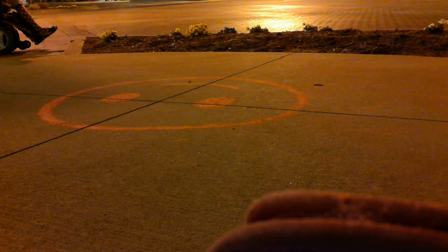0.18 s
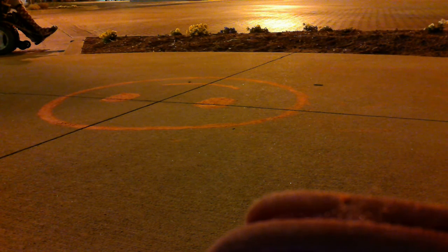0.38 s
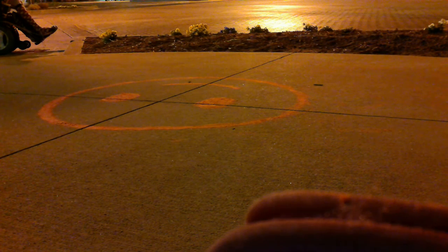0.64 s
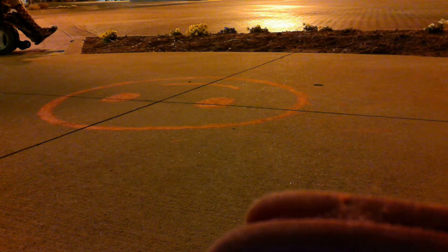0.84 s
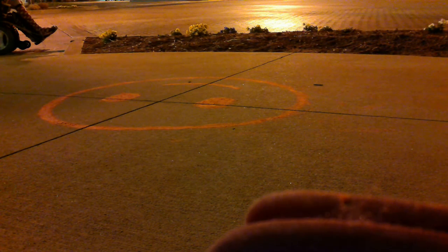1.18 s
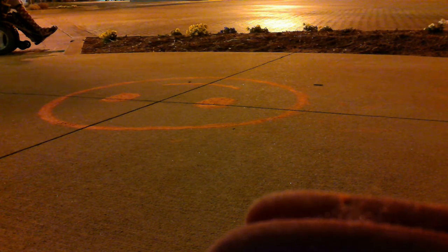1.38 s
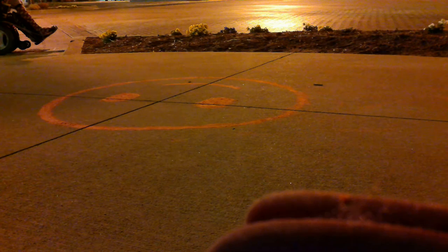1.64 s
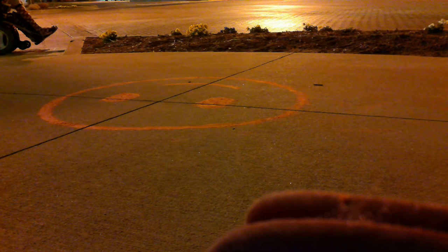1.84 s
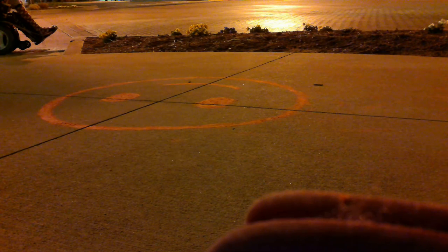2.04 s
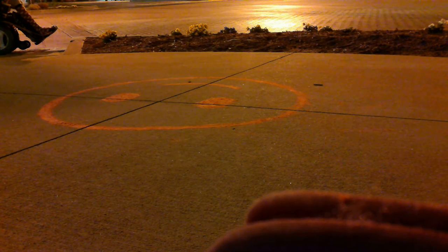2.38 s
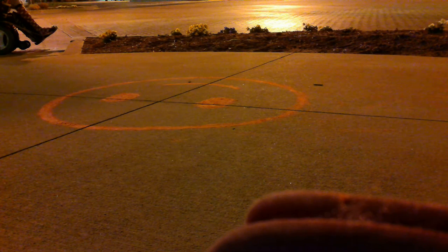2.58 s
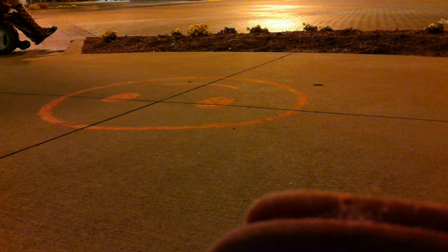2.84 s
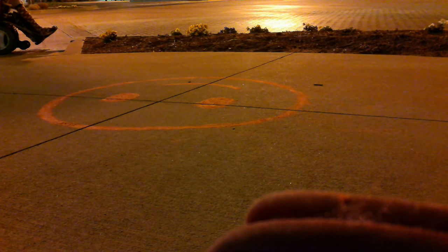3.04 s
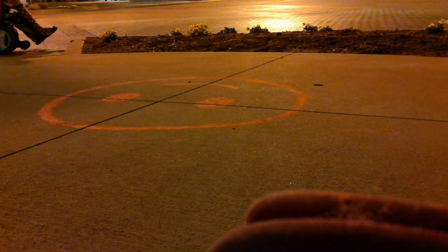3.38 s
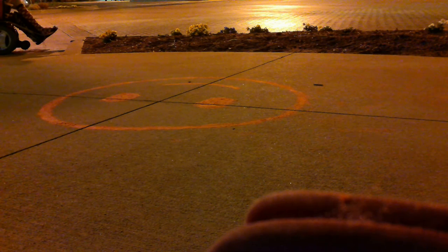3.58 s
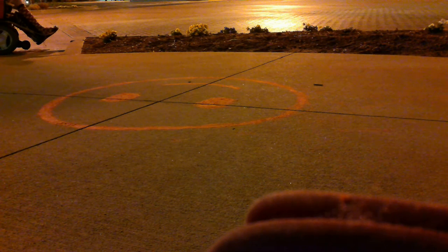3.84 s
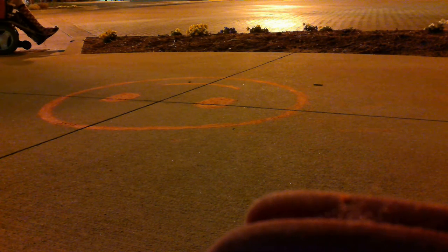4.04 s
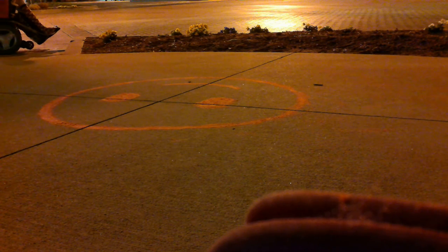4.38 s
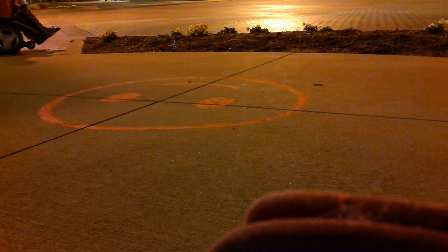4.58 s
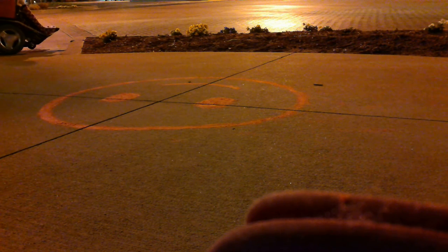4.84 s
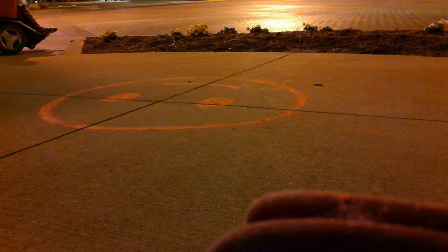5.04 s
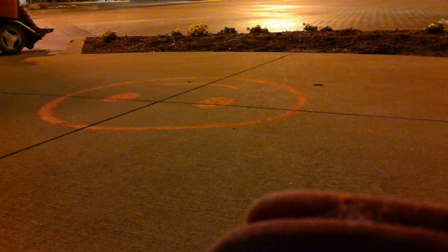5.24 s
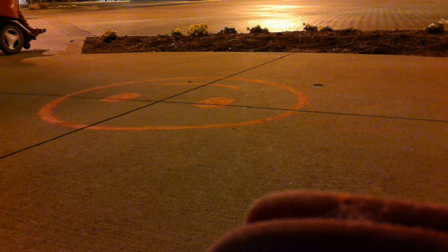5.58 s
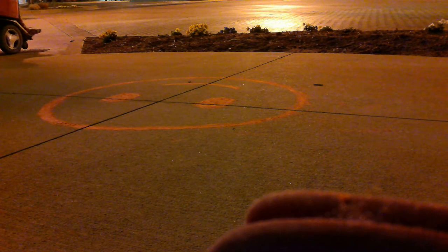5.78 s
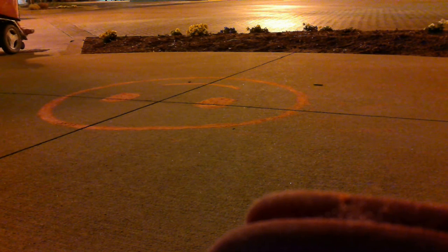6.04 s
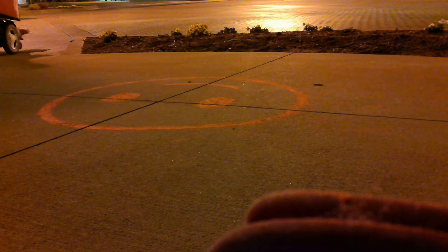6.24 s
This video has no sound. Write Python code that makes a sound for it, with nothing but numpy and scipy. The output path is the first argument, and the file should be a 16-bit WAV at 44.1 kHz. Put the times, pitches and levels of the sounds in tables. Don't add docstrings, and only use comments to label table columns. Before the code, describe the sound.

Open paved area, quiet town rumble below and a thin, constant high hiss. At 0 s a deep pulsing motor hum, roughly 57 pulses a second, sounds under a soft far tyre rush that fades over the first second or so. By 0.7 s the hum has thinned and slowed; from 1.3 s it builds as the vehicle creeps nearer, rising slightly around 2 s. At 1.93 s a stone snaps sharply, with a brief panel ring and small rattles. From 2.5 to 4.2 s the drone lopes unevenly and close, with faint metallic ticks and sandy flecks. Fine grit crackles at 4.3-4.5 s. The pitch sags to a heavy throb near 4.8-5.1 s, then climbs strongly to about 6 s, with near wheel rush, singing panels and a dull pebble tick at 5.73 s. It eases slightly, still humming, at 6.4 s. Treble drifts from left to right.

```python
import sys
import numpy as np
from scipy import signal
from scipy.fft import rfft, irfft
from scipy.io import wavfile
from scipy.ndimage import uniform_filter1d

SR = 44100
rng = np.random.default_rng(int(sys.argv[2]) if len(sys.argv) > 2 else 0)


def gain_from_db(level_db):
    decades = np.asarray(level_db, float) / 20
    return 10 ** decades


def master_out(mix):
    frames = np.transpose(np.atleast_2d(mix))
    ceiling = np.clip(frames, -1, 1)
    pcm = np.round(ceiling * 32767).astype(np.int16)
    wavfile.write(sys.argv[1], SR, pcm)


N = 283122
TIME = np.arange(N) / SR
FREQ = np.maximum(np.arange(N // 2 + 1) * SR / N, 1)

# time in seconds, pulse rate in Hz.
PULSE_RATE = [(0.0, 57.22), (0.4, 53.33), (0.8, 50.3), (1.4, 48.8), (1.6, 49.68), (1.9, 53.35),
              (2.2, 54.37), (2.4, 52.77), (2.6, 50.35), (3.0, 49.09), (3.6, 50.17), (4.2, 46.12),
              (4.8, 37.11), (5.1, 37.2), (5.4, 44.66), (5.8, 58.46), (6.0, 61.4), (6.42, 56.39)]
# time in seconds, distance in metres.
DISTANCE_M = [
    (0.0, 7.8),
    (0.7, 7.5),
    (1.7, 3.34),
    (2.0, 3.12),
    (3.4, 2.43),
    (4.4, 2.64),
    (5.0, 3.4),
    (5.5, 2),
    (5.75, 1.3),
    (6.42, 1.8),
]


def curve(table):
    seconds, *columns = np.transpose(table)
    return [np.interp(TIME, seconds, column) for column in columns]


def over_hz(table):
    hz, value = np.array(table).T
    return np.interp(np.log(FREQ), np.log(hz), value)


def unit(x):
    return x / np.sqrt(np.mean(x ** 2))


def walk(rate, size=N):
    hold = int(SR / rate)
    steps = np.repeat(rng.standard_normal(size // hold + 1), hold)
    return 1.71 * uniform_filter1d(uniform_filter1d(steps, hold), hold)[:size]


def ring(x, hz, width):
    b, a = signal.iirpeak(min(hz, 0.45 * SR), hz / width, SR)
    return signal.lfilter(b, a, x)


def pipe(x, modes):
    out = 0
    for k, (hz, width, db) in enumerate(modes):
        wide = 1.43 * width
        out = out + (-1) ** k * gain_from_db(db) * ring(ring(x, hz, wide), hz, wide)
    return unit(out)


def airy(spectrum, swell_db, flicker_db):
    lowest_hz, highest_hz = spectrum[0][0], spectrum[-1][0]
    noise = rfft(rng.standard_normal((2, N))) * gain_from_db(over_hz(spectrum))
    noise[:, (FREQ < lowest_hz) | (FREQ > highest_hz)] = 0
    swell = swell_db * walk(1.55)
    first, last = np.log2([lowest_hz, highest_hz]).astype(int)
    out = 0
    for octave in range(first, last + 2):
        part = np.cos(np.pi / 2 * np.clip(np.log2(FREQ) - octave, -1, 1)) ** 2
        out = out + gain_from_db(swell + flicker_db * walk(14)) * irfft(noise * part, N)
    return unit(out)


def echoed(x, lag_s):
    return np.array([x, np.pad(x, (int(lag_s * SR), 0))[:N]])


def town():
    # frequency in Hz, level in dB.
    rumble = [(15, -4), (28, -19), (45, -12.5), (80, -10), (140, -15), (300, -25.5)]
    return gain_from_db(-34.5) * airy(rumble, swell_db=2.4, flicker_db=-2.0)


def recorder_hiss():
    # frequency in Hz, level in dB.
    hiss_colour = [(4000, 2), (5500, 0), (7000, -9), (8600, -9.5), (9600, -4.5), (12000, -1), (13500, 1),
                   (15300, 2), (15780, -5)]
    hiss = gain_from_db(-60) * airy(hiss_colour, swell_db=0.2, flicker_db=0.5)
    return hiss + gain_from_db(-76) * np.sin(2 * np.pi * 14700 * TIME)


def tyres():
    # frequency in Hz, level in dB.
    road_colour = [(110, -8), (200, -11.5), (300, -17), (570, -21), (1000, -24), (1600, -32), (2500, -42),
                   (4500, -52.5)]
    recedes_s, rolls_from_s, rise_s = 0.62, 5.04, 0.61
    far = gain_from_db(-36.5) / np.hypot(1, TIME / recedes_s) ** 0.53
    near = gain_from_db(-41.5) * np.clip((TIME - rolls_from_s) / rise_s, 0, 1)
    road = airy(road_colour, swell_db=0.3, flicker_db=0.9)
    return far * road, near * road[:, ::-1]


def flecks():
    per_second, hz, width_hz = 41, 3820, 1100
    chance, size = rng.random(N), rng.exponential(size=N)
    hits = (chance < per_second / SR) * gain_from_db(-49 + 2.5 * np.minimum(size, 3))
    grains = uniform_filter1d(hits, size=260) * 260 * rng.standard_normal(N)
    return ring(ring(grains, hz, width_hz), hz, width_hz) / curve(DISTANCE_M)[0]


def grit():
    # start in seconds, peak in dB, ring in Hz, time to fall 60 dB in seconds, brightness in dB.
    snaps = [
        (1.9286, -15, 4800, 0.0067, -2),
        (1.929, -26, 1900, 0.018, -20),
        (1.93, -20, 5270, 0.013, 7),
        (1.936, -36, 5800, .014, -10),
        (1.9425, -38, 3500, .015, -14),
        (1.9625, -33, 1600, .03, -12),
        (1.9705, -47, 1700, 0.018, -14),
        (1.9775, -35, 6000, .02, -6),
        (1.9855, -40, 5600, .015, -10),
        (1.9944, -32, 6200, .016, -6),
    ]
    # start in seconds, peak in dB, ring in Hz.
    fine_grit = [(4.2914, -50, 10530), (4.316, -34, 12500), (4.3354, -40, 11000), (4.3375, -39, 11000),
                 (4.357, -42, 11000), (4.3735, -41, 11500), (4.388, -45, 11000), (4.418, -43, 11000),
                 (4.433, -45, 12000), (4.468, -45, 10600), (4.402, -37.5, 10000), (4.4503, -41, 9500),
                 (4.862, -41, 8200), (5.0824, -38.5, 7640), (5.2849, -42, 7337)]
    # frequency in Hz, level in dB, time to fall 60 dB in seconds.
    panel_modes = [(790, -5, .04), (1014, -9.5, 0.13), (1220, -8, 0.085), (1406, -5, 0.082),
                   (1620, -2, 0.05), (1860, -1.5, 0.07), (2230, -2, .025), (2640, -4, 0.039),
                   (3900, 8, 0.013), (4660, -5, .012), (5300, 7.5, 0.012), (5750, -7, .012),
                   (6200, 7, 0.018)]
    out, t = np.zeros(N + 4096), np.arange(4096) / SR
    fine_fall_s, fine_bright_db = 0.008, -3
    stones = list(snaps) + [(*row, fine_fall_s, fine_bright_db) for row in fine_grit]
    for s, peak_db, hz, t60, bright_db in stones:
        crack = rng.standard_normal(4096) * gain_from_db(-60 * t / max(t60, 0.002))
        width = hz * (1.3 if peak_db > -20 else 0.75)
        pitch = unit(ring(ring(crack, hz, width), hz, width))
        grain = pitch + gain_from_db(bright_db) * unit(ring(crack, 12000, 8000))
        out[int(s * SR):][:4096] += gain_from_db(peak_db) * grain / np.abs(grain).max()
    panel = sum(gain_from_db(db - 60 * t / t60) * np.sin(2 * np.pi * hz * t) for hz, db, t60 in panel_modes)
    panel = panel * np.minimum(t / 0.00057, 1)
    scatter = ring(ring(rng.standard_normal(4096), 6100, 2200), 6100, 2200)
    scatter = scatter * gain_from_db(-60 * t / 0.64) * (t < 0.072)
    out[int(snaps[0][0] * SR):][:4096] += gain_from_db(-30.0) * panel + gain_from_db(-39.5) * scatter
    return out[:N]


def pebble():
    # start in seconds, peak in dB.
    strikes = [
        (5.7325, -29),
    ]
    # frequency in Hz, level in dB, time to fall 60 dB in seconds.
    arch_modes = [(1920, -1, 0.024), (1600, -16, .012), (2350, -18, .012), (2840, 1, 0.019),
                  (3230, -3, .012), (3540, 0, 0.017), (4980, -4, .012), (7300, -6, .01), (9200, -8, .01),
                  (11000, -12, .01)]
    out, t = np.zeros(N), np.arange(2048) / SR
    arch = sum(gain_from_db(db - 60 * t / t60) * np.sin(2 * np.pi * hz * t) for hz, db, t60 in arch_modes)
    arch = arch * np.minimum(t / 0.00015, 1)
    for s, peak_db in strikes:
        out[int(s * SR):][:2048] += gain_from_db(peak_db) * arch / np.abs(arch).max()
    return out


def tappets():
    # start in seconds, peak in dB, ring in Hz.
    ticks = [(1.401, -51, 3150), (1.4065, -50, 4110), (1.455, -57, 4150), (1.665, -52, 2350),
             (1.692, -48, 2540), (1.77, -52, 3150), (1.954, -39.5, 2350), (1.9944, -44, 4100),
             (2.1821, -55, 3772), (2.3228, -60, 4448), (2.4151, -57, 3560), (2.484, -60, 3978),
             (2.6805, -50, 3752), (2.8082, -53, 4120), (2.9354, -56, 3440), (3.0063, -58, 3650),
             (3.118, -46, 4250), (3.1689, -48, 3840), (3.3305, -48, 4000), (3.3859, -55, 3414),
             (3.4418, -49, 4420), (3.4917, -51, 4390), (3.553, -57, 3780), (3.5969, -54, 4365),
             (3.6837, -62, 3678), (3.7586, -55, 3550), (3.8104, -52, 4220), (3.8713, -56, 3560),
             (3.9252, -50, 3624), (3.9686, -55, 3617), (4.0898, -49, 3530), (4.1447, -50, 4470),
             (4.2065, -57, 3636), (4.2679, -52, 4178), (4.3253, -49, 3820), (4.45, -53, 4438),
             (4.5099, -49, 4445), (4.6411, -57, 3730), (4.7129, -49, 3420), (4.7822, -47.5, 3600),
             (4.865, -49, 3936), (4.9339, -51, 3960), (5.0022, -54, 3530), (5.0816, -50, 3540),
             (5.1444, -59, 3620), (5.2138, -58, 3490), (5.2891, -52, 3550), (5.341, -48, 3510),
             (5.4173, -57, 3660), (5.4622, -52, 3560), (5.5171, -47, 3560), (5.6562, -51, 4028),
             (5.7325, -44, 3480), (5.8039, -52, 4464), (5.8573, -53, 3560), (5.8937, -50, 3560),
             (5.9446, -48, 3520), (6.0693, -49, 3571), (6.2933, -51, 3631), (6.3621, -49, 3809)]
    # frequency in Hz, level in dB.
    cover_modes = [(3620, -8), (3900, -23), (4180, -11), (4440, -4.5)]
    trim_db, rise_s, fall_s = -5.5, 0.0012, 0.047
    out, t = np.zeros(N + 2048), np.arange(2048) / SR
    shape = (1 - np.exp(-t / rise_s)) * gain_from_db(-60 * t / fall_s)
    shape = shape / shape.max()
    cover = sum(gain_from_db(db) * np.sin(2 * np.pi * hz * t) for hz, db in cover_modes)
    for s, peak_db, hz in ticks:
        tone = np.sin(2 * np.pi * hz * t) + cover
        out[int(s * SR):][:2048] += gain_from_db(peak_db + trim_db) * shape * tone
    return out[:N]


def singing():
    # start in seconds, length in seconds, frequency in Hz, peak in dB.
    tones = [(0.0, 0.49, 304.7, -51), (.85, 0.45, 318, -49), (1.6, 0.38, 322.2, -46),
             (1.85, 0.59, 426.3, -46), (2.0, 0.32, 535, -54), (2.4, .22, 355, -49), (2.65, .55, 318, -46),
             (3.3, .5, 324, -46), (3.95, .3, 310, -46), (5.12, 0.4, 326, -44), (5.6, .5, 356, -47),
             (5.7, .7, 263, -45), (4.22, 0.34, 60, -35), (.9, .75, 111, -33), (1.2, .45, 124, -34),
             (0.0, .5, 185, -41), (.7, .95, 185, -41), (1.0, .6, 215, -46), (2.6, .6, 112, -35),
             (3.4, .25, 424, -48), (3.45, .25, 540, -52), (3.75, 0.3, 441, -49), (3.718, 0.2, 623, -52),
             (4.72, 0.17, 264, -46), (4.28, 0.16, 318, -45), (4.9, 0.19, 312, -43), (4.1, .3, 217, -43),
             (4.6, .17, 213, -42), (5.3, .45, 535, -51), (5.3, 0.35, 422, -47), (5.7, 1.1, 541, -46),
             (5.65, 0.65, 304, -39), (5.65, 1.0, 320, -39), (5.5, 1.0, 212, -37), (5.9, .7, 225, -38),
             (5.75, .75, 424, -44), (.72, .3, 120, -38), (2.7, .5, 183, -41), (5.62, .3, 180, -38),
             (6.0, 0.51, 616, -55), (3.3, .7, 228, -43), (4.5, .25, 322, -50)]
    trim_db, wobble_db, drift_share = -0.16, 2, 0.003
    out = np.zeros(N + 2 * SR)
    for s, length, hz, peak_db in tones:
        drift, wobble = walk(11.7, size=2 * SR), walk(15.74, size=2 * SR)
        n = int(np.clip(length, 0.05, 1.9) * SR)
        turns = np.cumsum(hz * (1 + drift_share * drift[:n])) / SR
        swell = np.sin(np.pi * np.arange(n) / n) * gain_from_db(peak_db + trim_db + wobble_db * wobble[:n])
        out[int(max(s, 0) * SR):][:n] += np.sqrt(2) * swell * np.sin(2 * np.pi * turns)
    return out[:N]


def pulses(scatter_db, jitter_ms, lumps, order):
    # strength in dB, extra path in milliseconds.
    cycle = [
        (3, 1.5),
        (-.5, -1.1),
        (-3.2, 0),
        (-.5, 2.6),
        (3, 0),
        (-.5, .4),
        (-3.2, 1.5),
        (-.5, 1.1),
    ]
    hz = curve(PULSE_RATE)[0]
    turns = np.cumsum(hz) / SR
    k = np.arange(int(turns[-1]))
    chance = rng.standard_normal((len(k), 2))
    lope = lumps * np.minimum(49 / np.interp(k, turns, hz), 1) ** 1.77
    strength_db, path_ms = np.array(cycle)[(k + order) % 8].T
    delay_ms = lope * path_ms + jitter_ms * chance[:, 0]
    at = np.interp(k + 0.2986, turns, TIME) + delay_ms / 1000
    out = np.zeros(N)
    out[np.clip(at * SR, 0, N - 1).astype(int)] = gain_from_db(lope * strength_db + scatter_db * chance[:, 1])
    return out


def silencer(x, echo=0.63):
    chambers_ms = [5.3, 8.9, 14.1, 23.7]
    spectrum = rfft(x)
    for ms in chambers_ms:
        turn = np.exp(-2j * np.pi * FREQ * ms / 1000)
        spectrum = spectrum * (turn - echo) / (1 - echo * turn)
    return irfft(spectrum, N)


def running_gear(puff):
    # frequency in Hz, level in dB.
    gear_colour = [(400, 2.5), (700, -12), (1000, -16), (1800, -15), (3500, -15), (4580, -20),
                   (4800, -24.5), (6500, -19.5), (9000, -24.5), (15000, -30)]
    return gain_from_db(-47.5) * airy(gear_colour, swell_db=0.2, flicker_db=1) * unit(1 + 0.4 * puff)


def drive():
    # frequency in Hz, width in Hz, level in dB.
    boom_modes = [(19.7, 7.7, 27.5), (48.8, 8.5, 20.5), (57, 22, 17.5), (80.5, 27, 7.5)]
    hum_modes = [(99, 18.8, -1.5), (111.54, 17, 5), (120.6, 14.3, -2.5)]
    rasp_modes = [(144.8, 8.1, -2), (185, 9.7, 4), (221.6, 22.8, -2.5), (261.1, 8.2, -8)]
    buzz_modes = [(312, 27.8, 0.5), (336.1, 10.7, -4), (360, 20.6, -4), (423.6, 12.5, -5.5),
                  (443.2, 29, -9), (537.6, 14.6, -7.5), (614.6, 19, -13.5)]
    # time in seconds, load in dB, back pressure in the pipe in dB,
    # throttle opening in dB.
    effort = [(0.0, 8, -4, -11), (0.3, 3.5, 2, -0.5), (0.7, -11.5, 5, 0.5), (1.27, -2.5, 3, -1),
              (1.7, -3, 4.5, -0.5), (1.95, 4, 4, 3), (2.25, 3, -3, 1.5), (2.57, -2, 2, -0.5),
              (3.33, 0, 0.5, -0.5), (4.15, 0.5, 0.5, -1.5), (4.45, 1, 2, -2), (4.68, 7.5, -2, -3.5),
              (4.79, -2.5, -1.5, -2.5), (4.95, 7.5, -2, -1.5), (5.15, 3.5, -1, -2.5), (5.4, 3.5, 4, 1.5),
              (5.7, 2, 1.5, -1.5), (6.08, 5, 6.5, -2), (6.42, 1, -1, -0.5)]
    load_db, back_db, open_db = curve(effort)
    metres = curve(DISTANCE_M)[0]
    faster_hz = curve(PULSE_RATE)[0] - 50
    beats = pulses(scatter_db=2.5, jitter_ms=0.47, lumps=0.95, order=0)
    body = pulses(scatter_db=1.48, jitter_ms=0.48, lumps=0.58, order=2)
    body = body - body.mean()
    puff = signal.lfilter([1], [1, -np.exp(-1 / (0.0051 * SR))], beats)
    turbulence = rng.standard_normal(N)
    flow = beats - beats.mean() + 0.008 * puff * turbulence
    tail = silencer(flow)
    boom_db = -24.5 + back_db - 0.73 * faster_hz - 0.056 * load_db - 0.5 * (metres - 3)
    hum_db = -21 + load_db
    rasp_db = -26 + open_db + 0.02 * faster_hz
    buzz_db = -33.5 + 0.5 * open_db + 0.25 * load_db + 0.02 * faster_hz
    drone = gain_from_db(boom_db) * pipe(body, boom_modes) + gain_from_db(hum_db) * pipe(body, hum_modes)
    exhaust = gain_from_db(rasp_db) * pipe(tail, rasp_modes) + gain_from_db(buzz_db) * pipe(tail, buzz_modes)
    tones = echoed((drone + exhaust) / metres + singing(), 0.065)
    return tones + running_gear(puff) / metres ** 0.5


def ports(x, tilt, shared, lag):
    share = np.clip(over_hz(shared), 0, 1)
    direct, scattered = rfft(x)
    both = direct * np.sqrt((1 + share) / 2)
    apart = scattered * np.sqrt((1 - share) / 2)
    later = np.exp(-2j * np.pi * FREQ * lag / SR)
    left = (both + apart) * gain_from_db(over_hz(tilt) / 2) * later
    right = (both - apart) * gain_from_db(-over_hz(tilt) / 2)
    return irfft(np.array([left, right]), N)


def scene():
    # frequency in Hz, left minus right in dB.
    near_tilt = [(60, -1), (300, -1.4), (1700, -1.9), (2800, -2.9), (4800, -1.4), (7000, -1.9),
                 (10500, 0.2), (12200, -.5), (13100, -4.6), (14200, -4.6), (15300, -1.8)]
    far_tilt = [(100, -.6), (700, 0.012), (1500, -0.65), (4000, .2)]
    # frequency in Hz, share that both hear from 0 to 1.
    near_shared = [(60, 1), (150, 1), (300, 0.96), (700, 0.73), (1700, 0.2), (2800, 0.29), (3800, 0.37),
                   (4800, 0.6), (6500, 0.72), (8000, 1), (10500, 0.08), (15000, .1)]
    stone_shared = [(300, .97), (700, .87), (1700, 0.7), (2800, 0.2), (3800, .35), (4800, 0.3),
                    (6500, 0.53), (8000, 0.6), (10500, .3), (15000, 0.1)]
    far_shared = [(100, .998), (300, 1), (800, 0.82), (1600, 0.52), (3000, 0.56)]
    # time in seconds, left minus right in dB.
    swing_table = [
        (0.0, 1),
        (1.3, 1.6),
        (2.6, 0.5),
        (5.0, -1.4),
        (6.42, -1.3),
    ]
    near_lag, far_lag = 4, 1
    rush, roll = tyres()
    small_sounds = echoed(tappets() + flecks(), 0.00041)
    near = drive() + roll + town() + recorder_hiss() + small_sounds
    steady = ports(near, near_tilt, near_shared, near_lag)
    swing = gain_from_db(curve(swing_table)[0] * np.array([[0.5], [-0.5]])) - 1
    stones = np.array([[1], [-0.59]]) * (grit() + pebble())
    stones = ports(stones, near_tilt, stone_shared, near_lag)
    far = ports(rush, far_tilt, far_shared, far_lag)
    return steady + swing * ring(steady, 4500, 7600) + far + stones


def top_cut(x):
    return signal.sosfilt(signal.butter(12, 15800, fs=SR, output="sos"), x)


def record(dry):
    top = signal.ellip(8, 0.2, 70, 15790, fs=SR, output="sos")
    mix = signal.sosfilt(top, dry)
    return top_cut(mix)


dry = scene()
out = record(dry)
master_out(out)
```